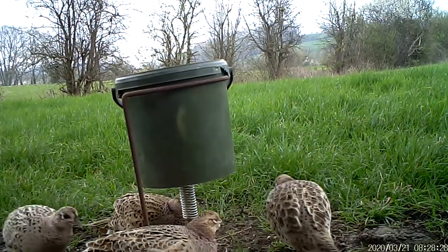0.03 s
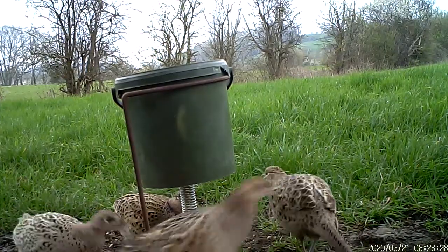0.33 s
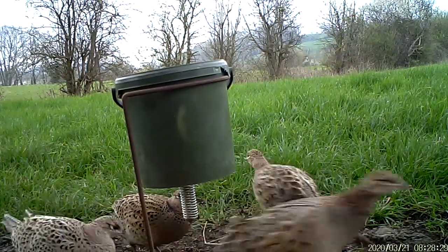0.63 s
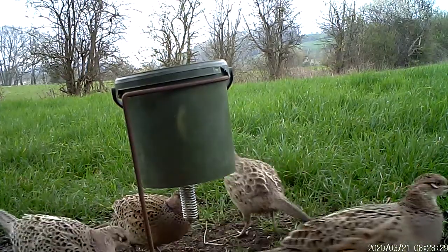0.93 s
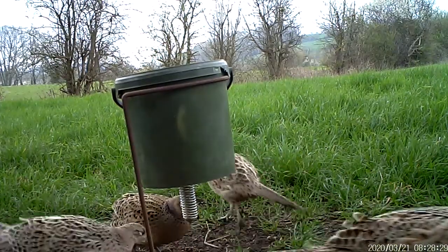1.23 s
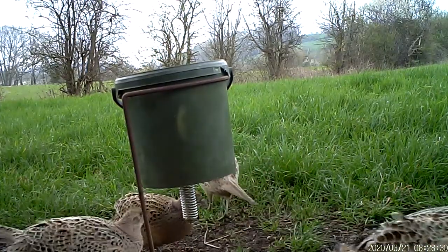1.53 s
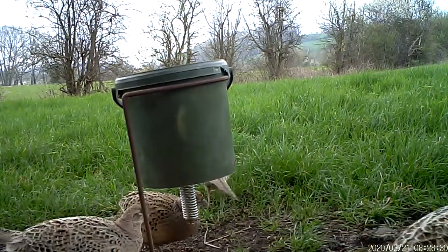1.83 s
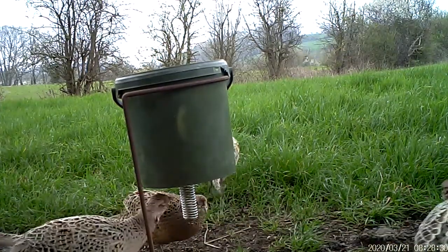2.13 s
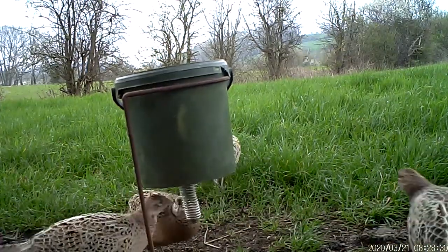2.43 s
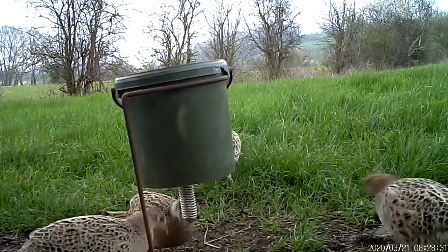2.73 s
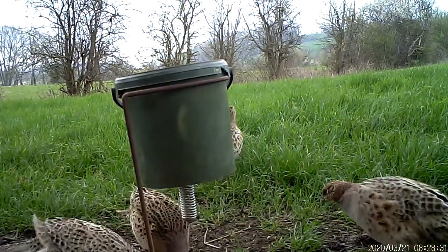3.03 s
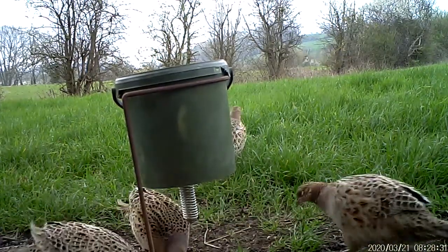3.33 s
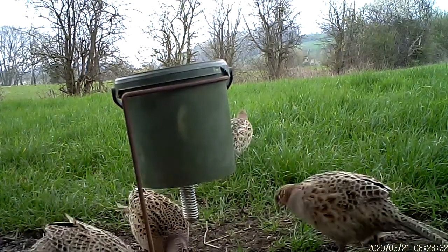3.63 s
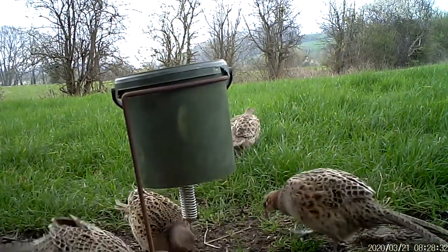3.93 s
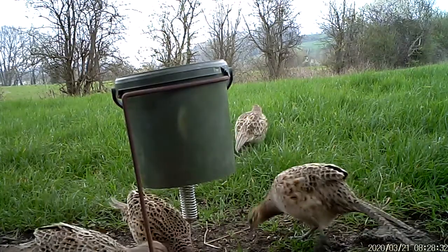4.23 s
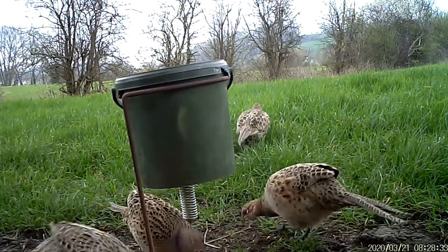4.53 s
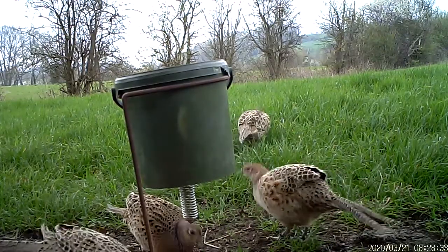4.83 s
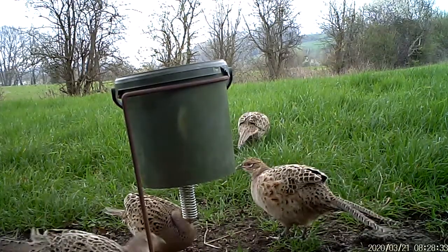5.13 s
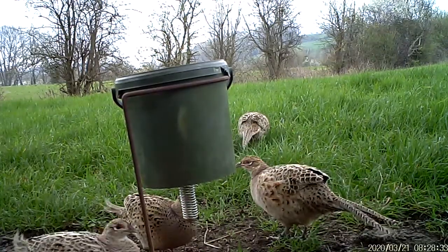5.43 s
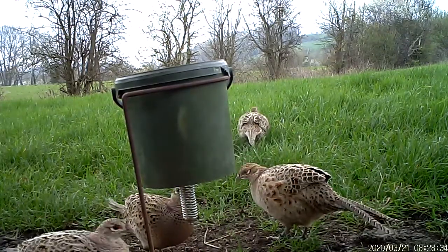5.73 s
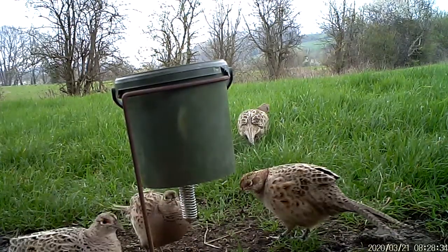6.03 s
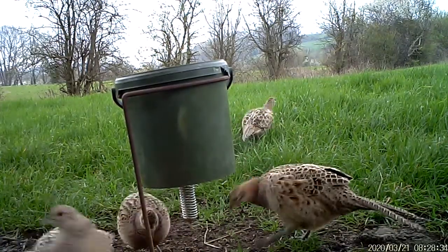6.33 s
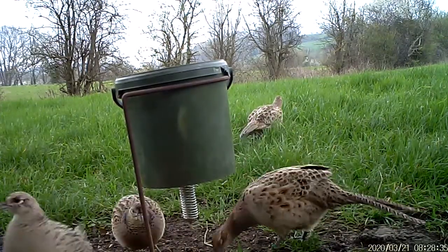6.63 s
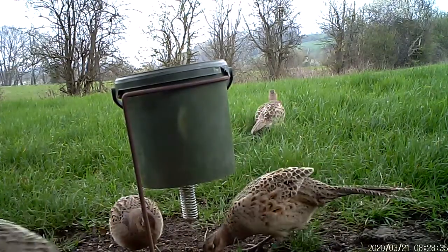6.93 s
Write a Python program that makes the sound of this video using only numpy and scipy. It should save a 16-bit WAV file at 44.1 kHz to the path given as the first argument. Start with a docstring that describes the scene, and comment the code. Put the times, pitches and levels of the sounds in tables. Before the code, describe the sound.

At a field edge, gusts of wind rumble and puff on a small outdoor microphone, with steady hiss and tiny crackling thumps. A small bird off in the trees begins with faint high chirps and thin whistles. A pheasant close by briefly shakes its feathers. The bird goes on with a quick trill, repeated rising and falling notes and a run of swoops as the wind grows stronger, then stops, leaving wind and hiss.

```python
"""Songbird at a windy field edge

A small bird off in the trees sings one phrase of thin whistles, a trill and swooping notes. Close by,
a pheasant at a feeder shakes out its feathers. Gusts buffet the microphone of a small outdoor camera,
which hisses, and crackles on the crest of the sharper thumps."""
import sys
import numpy as np
from scipy import signal
from scipy.fft import rfft, irfft, next_fast_len
from scipy.io import wavfile
from scipy.ndimage import uniform_filter1d, map_coordinates

SR = 44100
rng = np.random.default_rng(int(sys.argv[2]) if len(sys.argv) > 2 else 0)


def to_wav(sig):
    """Store sig (one row per channel, or 1-D mono) as 16-bit WAV at the path in sys.argv[1].

    Samples outside -1..1 are clipped; the rate is SR.
    """
    pcm = np.clip(np.atleast_2d(sig), -1, 1) * 32767
    pcm = np.round(pcm).astype(np.int16)
    wavfile.write(sys.argv[1], SR, pcm.T)  # frames by channels


N = 316197
TIME = np.arange(N) / SR

# The colour of each noise. Each row: frequency in Hz, relative spectral density in dB.
HISS_SPECTRUM = [(30, 9.5), (300, 0), (700, 2), (1200, -1.5), (2000, -4), (4000, -7.5), (6000, -9),
                 (9000, -9.5), (12000, -12), (15500, -14.5)]
RUMBLE_SPECTRUM = [(2, 3), (10, 5), (22, -2), (35, -2), (60, -11), (100, -13.5), (160, -22.5), (260, -36),
                   (500, -64), (2000, -130)]
RUSH_SPECTRUM = [(60, -18.5), (140, -3), (220, -6), (320, -11), (500, -18), (800, -28.5), (1300, -45),
                 (2000, -59), (4000, -83), (9000, -110)]
PUFF_SPECTRUM = [(30, 6.5), (130, 3), (250, 1), (450, -13.5), (800, -16), (1300, -25.5), (2000, -35),
                 (3200, -51), (6000, -60), (12000, -100)]
FIZZ_SPECTRUM = [(100, -16), (1000, 3), (4000, 2), (15000, -22)]
FEATHER_SPECTRUM = [(300, 8.5), (800, 1), (1800, -2), (2900, 0), (3300, 0.5), (3900, 9), (4400, 1),
                    (5000, 3), (5900, -6), (7200, 0), (8200, -1.5), (9100, 5.5), (10500, -7.5),
                    (15000, -20)]

# Brief swells of the hiss. Each row: peak time in seconds, lift in dB.
HISS_SWELLS = [(1.03, 4), (1.78, 4), (2.02, 7.5), (2.15, 6.5), (4.88, 4.5), (4.96, 3.5), (5.15, 4.5),
               (5.68, 3.5), (6.08, 5.5), (6.9, 5.5), (7.12, 4)]
# The breeze between gusts. Each row: time in seconds, relative rumble level in dB.
BREEZE = [(0, -34), (1.7, -39), (2.3, -34.5), (3.0, -33.5), (3.8, -25), (4.5, -30), (5.5, -34), (6.2, -34),
          (7.17, -39)]
# Gusts on the microphone. Each row: peak time and half-width in seconds, relative rumble and rush in dB.
GUSTS = [(0.123, 0.012, -33.5, -50), (0.295, 0.049, -28.5, -44.5), (.49, 0.057, -33, -54),
         (.72, 0.059, -31.5, -46.5), (0.857, 0.038, -27.5, -50), (1.058, .037, -30, -54.5),
         (1.205, 0.054, -31.5, -47), (1.395, 0.051, -32.5, -51), (1.486, 0.034, -18.5, -40.5),
         (1.57, 0.057, -29.5, -45), (1.849, 0.049, -29, -46), (2.191, 0.024, -37, -49),
         (2.29, 0.062, -41, -53), (2.469, .03, -30.5, -40), (2.86, 0.026, -24.5, -45),
         (2.961, 0.027, -24.5, -49.5), (3.071, 0.045, -26.5, -42), (3.409, 0.019, -29.5, -41.5),
         (3.605, 0.089, -25, -45), (3.757, 0.025, -24.5, -37.5), (3.945, 0.054, -20.5, -41.5),
         (4.119, 0.024, -23, -43), (4.275, 0.04, -21.5, -42), (4.38, 0.058, -23.5, -43),
         (4.662, 0.021, -25, -41.5), (4.778, 0.025, -29, -55), (5.053, 0.034, -29, -43),
         (5.223, 0.053, -21.5, -41.5), (5.46, 0.074, -25, -47), (5.59, 0.053, -25, -45),
         (5.945, 0.057, -23, -42.5), (6.332, 0.036, -25, -41.5), (6.498, 0.031, -26, -52),
         (6.645, 0.071, -27, -45.5), (6.955, 0.036, -30, -48), (7.146, .025, -35.5, -47.5)]
# Puffs of air on the microphone. Each row: peak time in seconds, relative level in dB,
# half-width in seconds.
PUFFS = [(0.301, -50, .0061), (0.324, -48, .0074), (0.716, -53, 0.0072), (1.228, -46.5, .011),
         (1.483, -45.5, 0.0089), (1.512, -41, .0056), (2.447, -48.5, 0.0064), (2.658, -43.5, .0041),
         (2.857, -38.5, 0.0037), (3.055, -40, 0.0046), (3.513, -42.5, 0.01), (3.563, -41, 0.0096),
         (3.602, -41.5, 0.0039), (3.637, -34, 0.013), (3.668, -42.5, 0.0063), (3.751, -38.5, 0.0062),
         (3.801, -39.5, 0.0079), (3.837, -40, 0.0074), (3.896, -33, 0.0033), (3.92, -31, .013),
         (3.998, -43.5, 0.02), (4.122, -44.5, 0.0098), (4.273, -38.5, 0.013), (4.372, -47, 0.014),
         (4.391, -37.5, 0.013), (4.659, -46, .0087), (5.054, -45.5, 0.0081), (5.185, -38.5, 0.007),
         (5.222, -39, 0.017), (5.26, -46.5, 0.02), (5.446, -46.5, .006), (5.548, -43.5, 0.0097),
         (5.578, -37.5, 0.0029), (5.948, -34.5, 0.0031), (6.623, -49, 0.0058), (6.69, -42.5, 0.0064)]
# Thumps that make the microphone crackle. Each row: time in seconds, relative level in dB, click count.
THUMPS = [(0.113, -60, 1), (0.235, -55.5, 3), (0.377, -59.5, 1), (0.445, -58.5, 1), (0.544, -60.5, 1),
          (0.625, -53.5, 2), (0.738, -52.5, 1), (0.846, -56, 3), (0.954, -58.5, 1), (1.035, -56, 3),
          (1.096, -58, 1), (1.172, -49, 1), (1.263, -59, 3), (1.335, -57.5, 1), (1.448, -49.5, 2),
          (1.6, -60.5, 1), (1.689, -61.5, 1), (1.796, -57, 1), (1.867, -56.5, 3), (1.924, -58.5, 1),
          (2.032, -54.5, 4), (2.071, -60, 3), (2.174, -51.5, 2), (2.218, -53, 4), (2.337, -53.5, 3),
          (2.389, -54, 1), (2.646, -54.5, 1), (2.749, -55, 4), (2.797, -60.5, 3), (2.964, -48, 1),
          (3.196, -58.5, 3), (3.256, -44, 2), (3.385, -55, 2), (3.472, -55, 1), (3.729, -60, 1),
          (4.081, -56, 1), (4.423, -49, 2), (4.576, -58.5, 1), (4.694, -49, 1), (4.908, -48, 2),
          (4.963, -52.5, 2), (5.041, -55, 1), (5.175, -46.5, 1), (5.495, -52.5, 1), (5.535, -47.5, 1),
          (5.71, -49, 2), (5.761, -60, 1), (5.798, -52, 4), (6.106, -49, 3), (6.173, -58, 1),
          (6.249, -58.5, 1), (6.287, -59.5, 1), (6.455, -55, 1), (6.501, -56.5, 1), (6.598, -57, 3),
          (6.708, -57, 1), (6.776, -56, 1), (6.922, -57, 2), (6.954, -53.5, 3), (7.144, -50.5, 2)]
# The pheasant's ruffles. Each row: peak time in seconds, relative level in dB, rise and fall in seconds.
RUFFLES = [(2.29, -63.5, 0.0073, 0.043), (2.445, -43.5, .001, .004), (2.46, -54.5, 0.071, 0.054),
           (2.505, -59, .001, .002), (2.61, -55.5, 0.03, 0.036), (2.745, -62, 0.059, 0.084)]

# Short straight chirps. Each row: start and length in seconds, relative level in dB,
# first and last pitch in Hz.
CHIRPS = [(.372, 0.051, -75, 5700, 4100), (.7, .05, -77, 4170, 4050), (1.203, 0.042, -67.5, 6050, 5250),
          (1.28, 0.023, -73, 4700, 4100), (1.37, 0.063, -77, 4080, 4100), (1.372, .018, -70, 7200, 6300),
          (1.42, .027, -72, 5570, 4600), (1.645, 0.024, -71, 5200, 4500), (1.74, 0.081, -78, 4700, 4600),
          (1.778, .012, -58, 8050, 7500), (2.145, .012, -51, 4220, 3850), (2.256, 0.015, -52, 5650, 5100),
          (2.345, .017, -69, 3870, 3800), (2.486, 0.019, -54, 7750, 6800), (2.747, .02, -59.5, 5150, 4300),
          (3.695, 0.057, -73, 8400, 9000), (4.335, 0.015, -67, 4300, 3900), (4.38, 0.014, -70, 4300, 3880),
          (4.428, .017, -73, 4470, 3960)]
# Arched whistles. Each row: start and length in seconds, relative level and its change over the note
# in dB, first, middle and last pitch of the arch in Hz, pitch offsets going in and coming out in Hz.
WHISTLES = [(1.491, .11, -64.5, 4, 8350, 8050, 7300, -1500, -600),
            (1.712, 0.073, -61, 2, 8450, 8280, 8200, -1400, -600),
            (1.915, 0.11, -57, 2, 5860, 6030, 6115, -300, -50),
            (2.11, .07, -65, 2, 4050, 4050, 3840, -2, 0),
            (2.513, 0.11, -50.5, -3.5, 7640, 7080, 7000, 0, 0),
            (2.71, 0.027, -49.5, -7, 5550, 5430, 5250, -4, 0),
            (3.156, 0.041, -51, -10, 6950, 7400, 7140, -200, 0),
            (4.111, 0.17, -65.5, -5, 8400, 7950, 7740, 300, 0),
            (4.482, 0.17, -62.5, -8, 6930, 6600, 6450, -1400, 0)]
# Syllables the bird repeats. Each row: offset in seconds, pitch in Hz, relative level in dB.
RISE_SHAPE = [(-.036, 4700, -9.5), (-.018, 4760, -4.5), (-.008, 5000, -6.5), (0, 5560, 2),
              (.007, 6050, -6.5), (.017, 6130, -19)]
FALL_SHAPE = [(-.005, 5900, 8), (0, 5510, -2), (.008, 4980, -1.5), (.02, 4470, -2), (.027, 4330, -8)]
SWOOP_SHAPE = [(-.02, 4820, -23), (-.007, 5650, -3), (.002, 6800, -2), (.014, 7670, -3), (.024, 8130, -2),
               (.04, 8030, -1.5), (.056, 7600, -3), (.08, 6490, -0.5), (.094, 5550, -5), (.115, 4530, -2)]
TICK_SHAPE = [(-.005, 7280, -6), (-.003, 6900, 9), (-.001, 5860, 2), (.001, 5750, 8), (.004, 5300, -3)]
# Their repeats. Each row: time in seconds, relative level in dB, length factor, pitch range factor
# and, for the swoops, accent on the crest in dB.
RISE_REPEATS = [(3.293, -51.5, 1.05, 1.06), (3.452, -50.5, 1.05, 0.93), (3.630, -53, 1.1, 1.3),
                (3.797, -54.5, 1.01, 1), (3.973, -52.5, 0.92, 1.15)]
FALL_REPEATS = [(3.343, -53, 0.9, 0.82), (3.506, -55.5, 1, 0.97), (3.686, -57, 1, 0.82),
                (3.850, -63, 1.1, 0.85), (4.024, -60, 0.99, 1.0)]
SWOOP_REPEATS = [(4.646, -59.5, 1, 1.11, -3.5), (4.831, -54, 0.99, 1.0, -1.5),
                 (5.009, -60, 1.07, 1.02, 0.5), (5.205, -61.5, 0.95, 1.0, 1), (5.386, -58.5, .95, 1.0, -1),
                 (5.565, -63, 0.93, 1, 8.5)]


def undb(db):
    """Decibels to gain."""
    return 10 ** (np.asarray(db) / 20)


def add(track, start_s, sound):
    """Mix a sound into a track from a given time."""
    start = int(round(start_s * SR))
    first, last = max(start, 0), min(start + len(sound), N)
    if last > first:
        track[first:last] += sound[first - start:last - start]


def noise(spectrum):
    """Noise of rms 1, coloured by a spectrum table."""
    hz, db = np.transpose(spectrum)
    size = next_fast_len(N)
    bins = np.maximum(np.fft.rfftfreq(size, 1 / SR), 1)
    gain = undb(np.interp(np.log(bins), np.log(hz), db))
    x = irfft(rfft(rng.standard_normal(size)) * gain, size)[:N]
    return x / x.std()


def wander(rate_hz):
    """A smooth random curve of spread 1 that changes rate_hz times a second."""
    x = map_coordinates(rng.standard_normal(4096), [TIME * rate_hz], order=2, mode="wrap")
    return x / x.std()


def steady(x, span_s):
    """Take the slow swells out of a noise, leaving rms 1."""
    size = int(span_s * SR)
    power = uniform_filter1d(uniform_filter1d(x ** 2, size), size)
    return x / np.sqrt(power + 1e-9)


def hiss(level_db=-68, swell_s=.026):
    """The hiss of the microphone and the open field, swelling briefly now and then."""
    swell_db = sum(db * np.exp(-.5 * ((TIME - s) / swell_s) ** 2) for s, db in HISS_SWELLS)
    return noise(HISS_SPECTRUM) * undb(level_db + swell_db)


def wind(rumble_gain_db=2.5, rush_gain_db=-.5, eddy_db=5, grit_db=-9):
    """Gusts over a breeze: slow pressure swings rumble at the microphone port, smaller eddies rush."""
    rumble_power = undb(np.interp(TIME, *np.transpose(BREEZE))) ** 2
    rush_power = rumble_power * undb(-26.5) ** 2  # the breeze is mostly rumble
    for s, width_s, rumble_db, rush_db in GUSTS:
        swell = np.exp(-np.abs((TIME - s) / width_s) ** 2.55)  # steeper sides than a bell curve
        rumble_power += swell * undb(rumble_db) ** 2
        rush_power += swell * undb(rush_db) ** 2
    rumble = steady(noise(RUMBLE_SPECTRUM), span_s=.058) * np.sqrt(rumble_power)
    eddies = steady(noise(RUSH_SPECTRUM), span_s=.036) + undb(grit_db) * noise(PUFF_SPECTRUM)
    rush = eddies * np.sqrt(rush_power) * undb(eddy_db * wander(70))
    return rumble * undb(rumble_gain_db) + rush * undb(rush_gain_db)


def puffs(gain_db=8, grain_db=1.5):
    """Fast eddies brush the microphone for hundredths of a second, grainy and brighter than the rush."""
    swell = np.zeros(N)
    t = TIME[:SR // 10] - .05
    for s, db, width_s in PUFFS:
        add(swell, s + t[0], undb(db) * np.exp(-np.abs(t / width_s) ** 1.75))
    return swell * undb(gain_db + grain_db * wander(400)) * steady(noise(PUFF_SPECTRUM), span_s=.0064)


def thumps(width_s=.0033, lead_s=.000098, gap_s=.002095, dip_db=30, click_db=17, fizz_db=-12):
    """A pressure dip thumps; toward its crest the microphone fizzes, then clicks in tiny square steps."""
    dips, clicks, fizz = np.zeros((3, N))
    t = TIME[:SR // 10] - .05
    rebound = np.exp(-.5 * (t / (3 * width_s)) ** 2) / 3
    dip = rebound - np.exp(-.5 * (t / width_s) ** 2)
    fizz_rise = np.exp(t[t < 0] / .005)
    step = np.ones(SR // 2000)
    faint_thumps = [(when * N / SR, -66.5 + 14 * size, 1) for when, size in rng.random((10, 2))]
    for s, db, count in THUMPS + faint_thumps:
        add(dips, s - lead_s + t[0], undb(db + dip_db) * dip)
        add(fizz, s + t[0], undb(db + fizz_db) * fizz_rise)
        jitter = rng.standard_normal(8)
        for k in range(count):
            from_crest = k - (count - 1) / 2
            height = undb(db + click_db - 6 * abs(from_crest) + 1.68 * jitter[k])
            add(clicks, s + gap_s * (from_crest + .14 * jitter[-1 - k]), -height * step)
    return dips + clicks + fizz * noise(FIZZ_SPECTRUM)


def feather_shake(gain_db=.5, beat_db=1.5, grain_db=3):
    """Close by, a pheasant's stiff feathers rub past each other in uneven ruffles and sharp flicks."""
    force = np.zeros(N)
    for s, db, rise_s, fall_s in RUFFLES:
        force += undb(db) * np.exp(-np.maximum((s - TIME) / rise_s, (TIME - s) / fall_s))
    flutter_db = beat_db * wander(70) + grain_db * wander(550)
    return force * undb(gain_db + flutter_db) * noise(FEATHER_SPECTRUM)


def scatter(x, t60_s, build_s):
    """A diffuse echo of unit gain that builds up and dies away."""
    t = TIME[:SR // 2]
    envelope = np.exp(-np.log(1000) * t / t60_s) * (1 - np.exp(-t / build_s))
    echo = rng.standard_normal(len(t)) * envelope
    return signal.fftconvolve(x, echo / np.linalg.norm(echo))[:N]


def trees(song):
    """Twigs round the bird smear each note; trunks further off add a soft tail."""
    twigs = undb(-3) * scatter(song, t60_s=.12, build_s=.002)
    trunks = undb(-7) * scatter(song, t60_s=.4, build_s=.012)
    return song + twigs + trunks


def syllable(shape, s, db, stretch=1, reach=1, accent_db=0):
    """One repeat of a shape, stretched in time and pitch range, its highest part accented."""
    t, hz, shape_db = np.transpose(shape)
    lift_hz = hz - hz.min()
    crest_db = accent_db * (lift_hz / lift_hz.max()) ** 2
    return np.column_stack([s + t * stretch, hz.min() + reach * lift_hz, db + shape_db + crest_db])


def song_notes(scoop_s=.007, drop_s=.0056, trill_start_s=2.817, trill_period_s=.0283):
    """Every note of the phrase. Each row of a note: time in seconds, pitch in Hz, relative level in dB."""
    notes = [np.array([(s, first, db), (s + length, last, db)]) for s, length, db, first, last in CHIRPS]
    along = np.linspace(0, 1, 60)
    for s, length, db, change_db, first, middle, last, scoop_hz, drop_hz in WHISTLES:
        t = along * length
        arch = np.polyval(np.polyfit([0, .5, 1], [first, middle, last], 2), along)
        slides = scoop_hz * np.exp(-t / scoop_s) + drop_hz * np.exp((t - length) / drop_s)
        notes.append(np.column_stack([s + t, arch + slides, db + change_db * (along - .5)]))
    notes += [syllable(RISE_SHAPE, *row) for row in RISE_REPEATS]
    notes += [syllable(FALL_SHAPE, *row) for row in FALL_REPEATS]
    notes += [syllable(SWOOP_SHAPE, *row) for row in SWOOP_REPEATS]
    trill = [syllable(TICK_SHAPE, trill_start_s + k * trill_period_s, db=-66.5) for k in range(12)]
    return notes + trill


def songbird(gain_db=-3, waver=.008, flutter_db=3.5, margin_s=.0026):
    """The small bird's pure tone glides through each note, unsteady in pitch and strength."""
    song = np.zeros(N)
    bend = 1 + waver * wander(260)
    flutter = flutter_db * wander(170)
    for note in song_notes():
        s, hz, db = note.T
        span = slice(int((s[0] - margin_s) * SR), int((s[-1] + margin_s) * SR))
        t = TIME[span]
        from_edge_s = np.minimum(t - t[0], t[-1] - t)
        fade = np.sin(np.pi / 2 * np.clip(from_edge_s / (2.35 * margin_s), 0, 1)) ** 2
        strength = undb(np.interp(t, s, db) + flutter[span])
        phase = 2 * np.pi * np.cumsum(np.interp(t, s, hz) * bend[span]) / SR
        song[span] += fade * strength * np.sqrt(2) * np.sin(phase)
    return song * undb(gain_db)


def scene():
    """One microphone at the field edge: song from the trees, feathers close by, wind right on it."""
    return (trees(songbird()) + wind() + puffs() + thumps() + feather_shake() + hiss())[None]


def record(dry):
    """The camera cuts the treble above 15750 Hz."""
    return signal.sosfilt(signal.ellip(8, .2, 60, 15750, fs=SR, output="sos"), dry)


dry = scene()
out = record(dry)
to_wav(out)
```